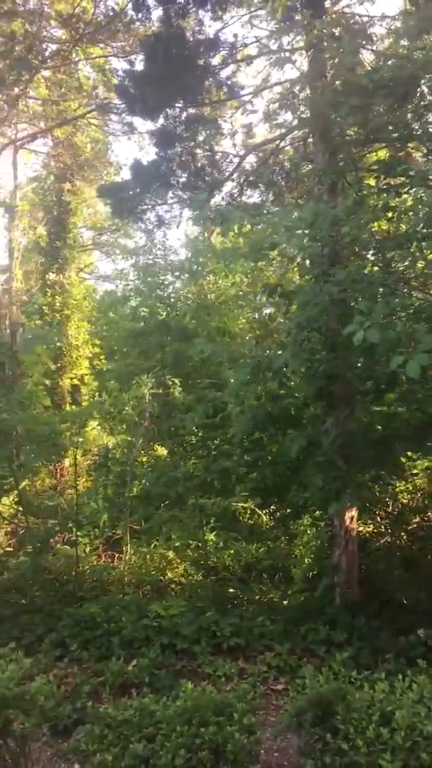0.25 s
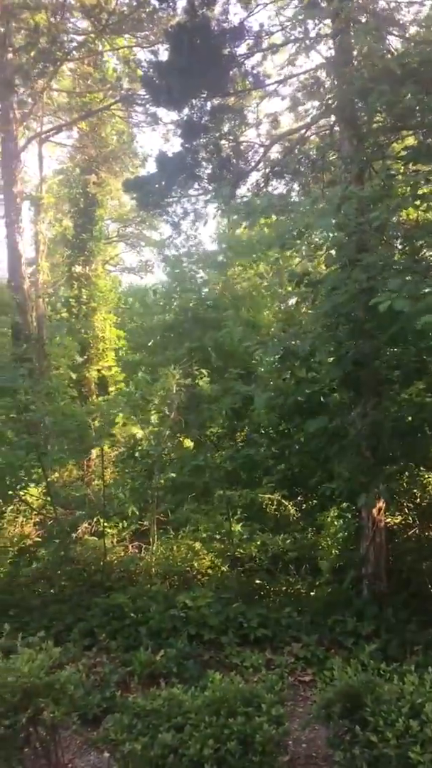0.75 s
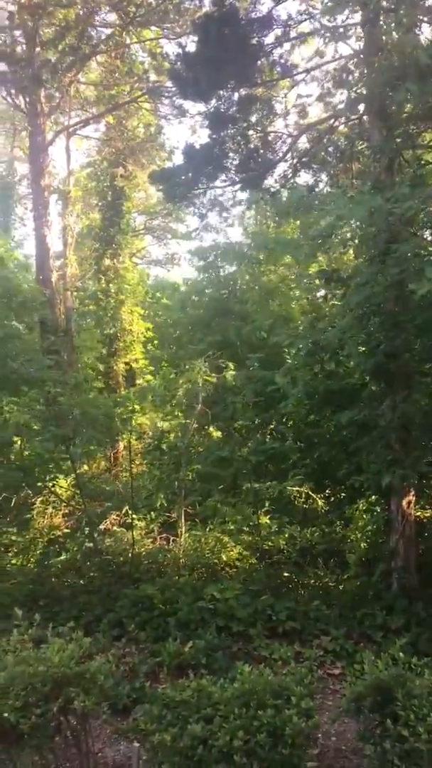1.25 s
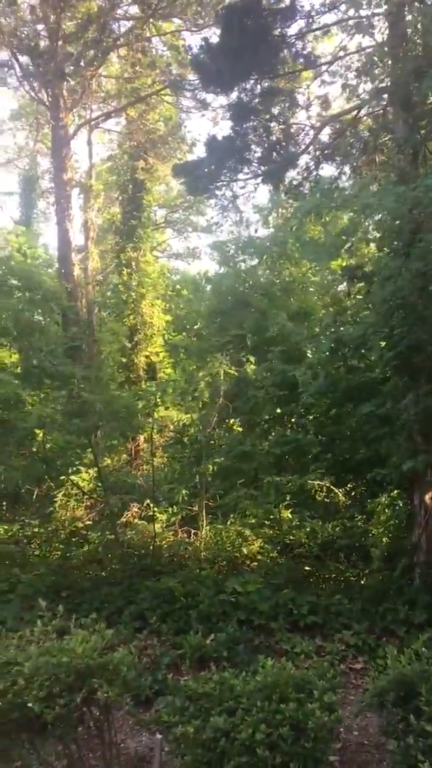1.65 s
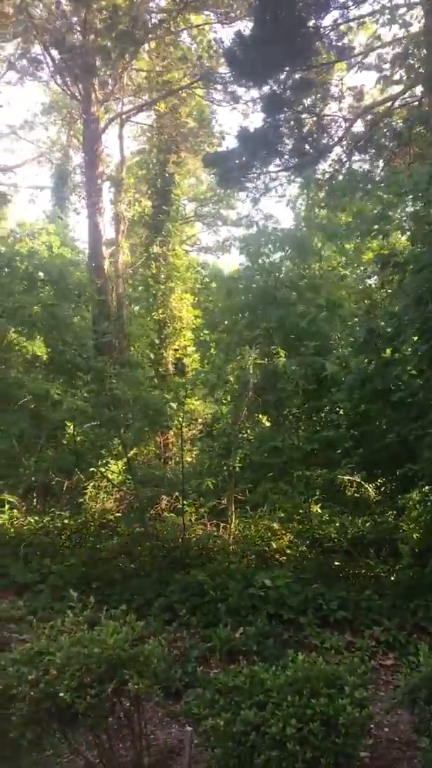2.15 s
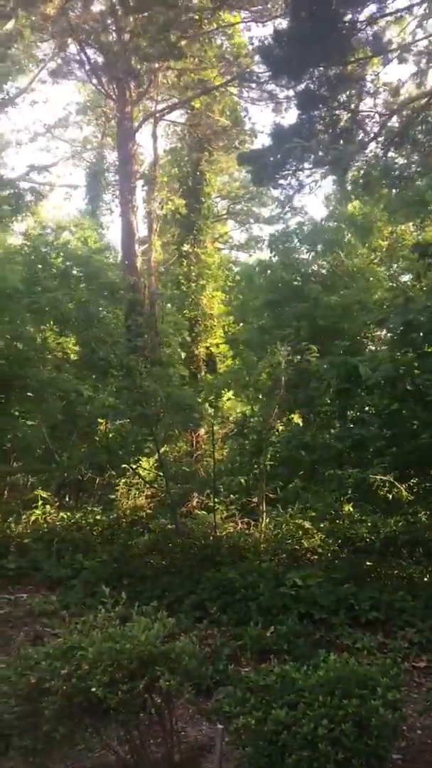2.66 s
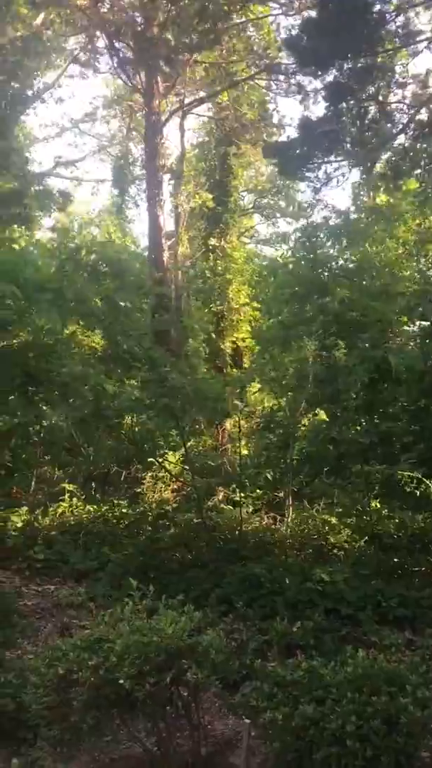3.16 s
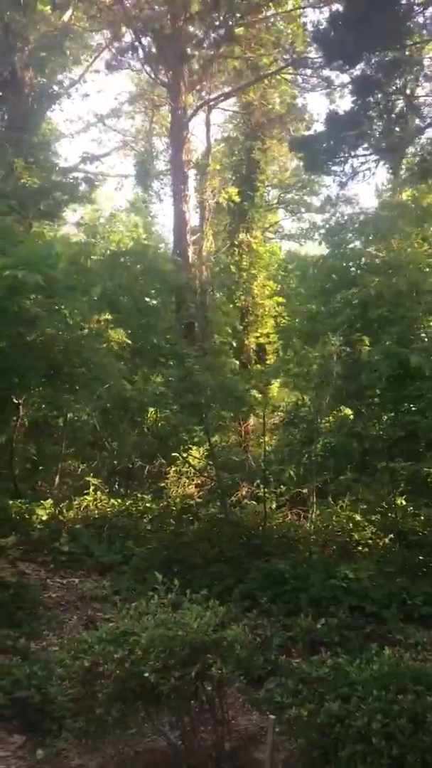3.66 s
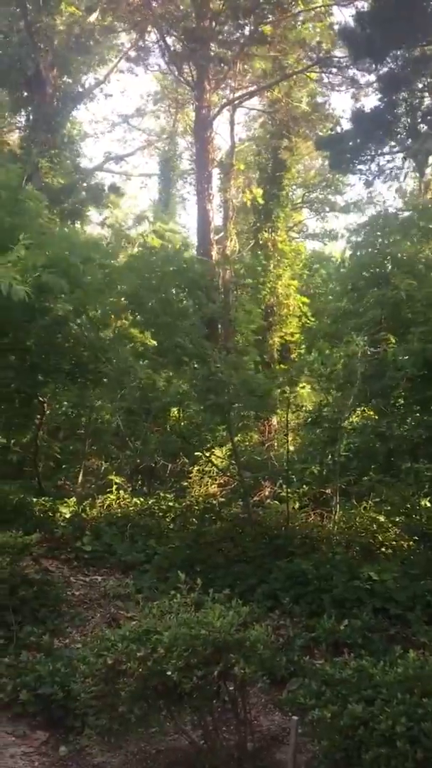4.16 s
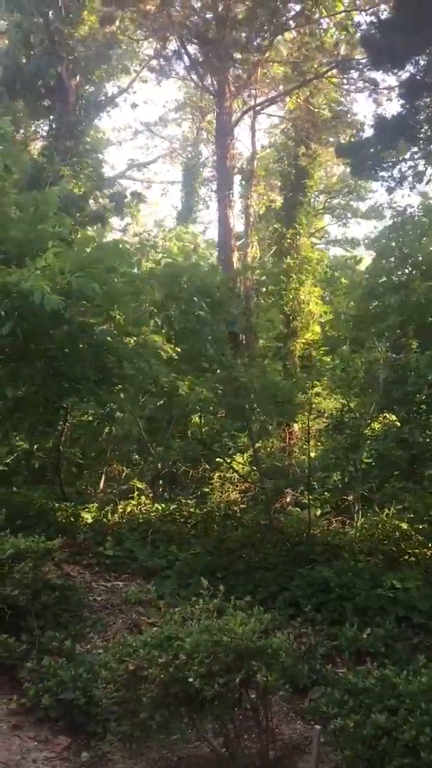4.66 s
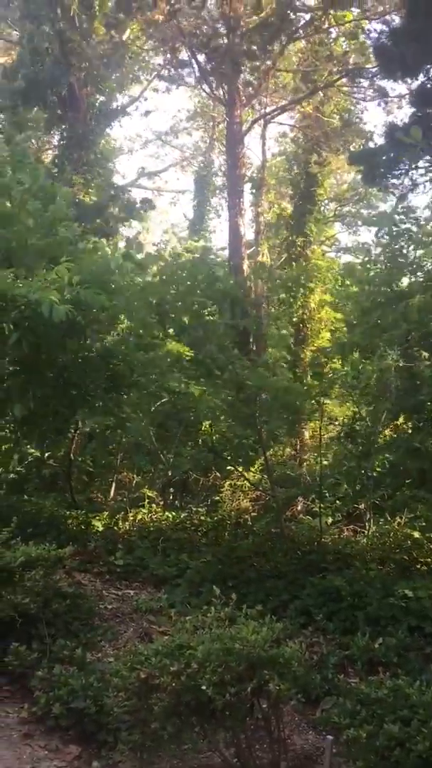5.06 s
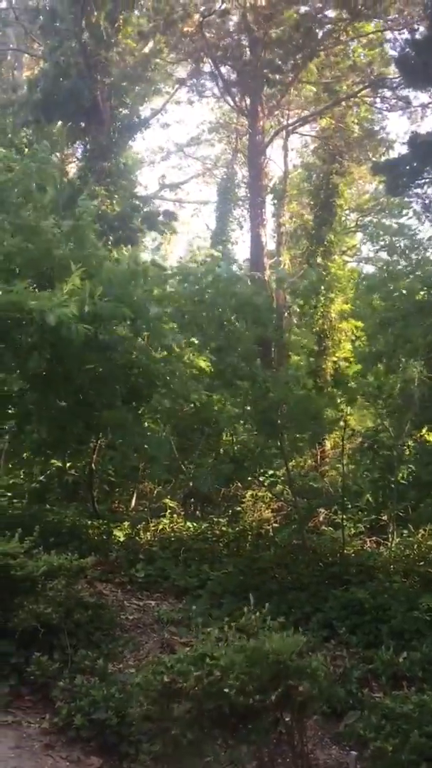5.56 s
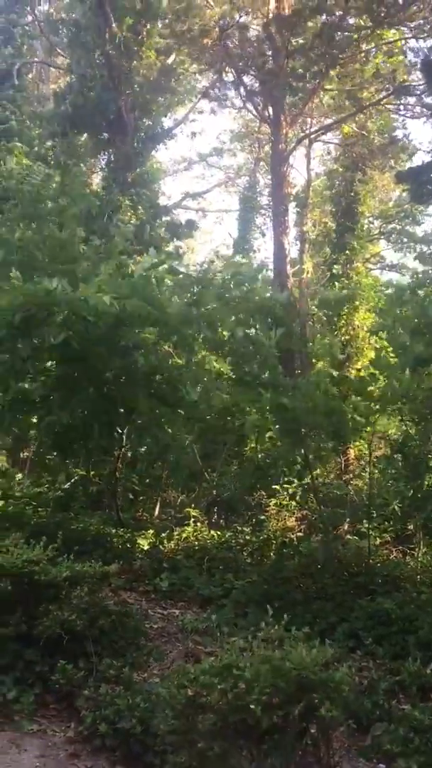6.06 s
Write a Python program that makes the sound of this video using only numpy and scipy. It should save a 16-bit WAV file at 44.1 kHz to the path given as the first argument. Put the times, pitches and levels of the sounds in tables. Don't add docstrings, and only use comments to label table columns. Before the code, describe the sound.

Continuous woodland wind, with broad canopy wash, crisp leaf hiss and fine ticking. At first a faint quick trill dies away deep in the wood. Regular distant falling-and-rising chirps follow, joined by short, high, thin whistles from a closer bird, all lightly echoing off trunks. In the last two seconds, low buffeting bumps and flutters on the microphone, almost mono, growing heavier before the end.

```python
import sys
import numpy as np
from scipy import signal
from scipy.fft import rfft, irfft, next_fast_len
from scipy.io import wavfile
from scipy.ndimage import uniform_filter1d, map_coordinates

SR = 44100
rng = np.random.default_rng(int(sys.argv[2]) if len(sys.argv) > 2 else 0)


def put_to_file(sound):
    columns = np.atleast_2d(sound).T
    safe = np.clip(columns, -1, 1)
    whole_steps = np.round(safe * 32767)
    wavfile.write(sys.argv[1], SR, whole_steps.astype(np.int16))


def undo_db(level):
    steps = np.asarray(level, float) / 20
    return 10 ** steps


N = 277830
TIME = np.arange(N) / SR


def unit(x):
    return x / np.sqrt(np.mean(x ** 2) + 1e-20)


def wobble(rate, size=N):
    knots = rng.standard_normal(int(size * rate / SR) + 4)
    return map_coordinates(knots, [TIME[:size] * rate])


def coloured(x, spectrum):
    m = next_fast_len(N + 8192)
    hz, db = np.transpose(spectrum)
    bins = np.fft.rfftfreq(m, 1 / SR)
    level = np.interp(np.log(bins + 1), np.log(hz + 1), db, -120, -120)
    return unit(irfft(rfft(x, m) * undo_db(level), m)[:N])


def smooth_field(shape, bins, frames):
    field = uniform_filter1d(rng.standard_normal(shape), size=bins, axis=0)
    return unit(uniform_filter1d(field, size=frames, axis=1))


def rush(spectrum, patchy_db, speckle_db=0):
    z = signal.stft(rng.standard_normal(N), nperseg=1024)[2]
    patches = patchy_db * smooth_field(z.shape, 12, 6)
    speckle = speckle_db * smooth_field(z.shape, 2, 3)
    noise = signal.istft(z * undo_db(patches + speckle), nperseg=1024)[1][:N]
    return coloured(noise, spectrum)


def evened(x, share):
    return unit(x / (np.abs(signal.hilbert(x)) + .25) ** share)


def bumps(rows):
    s, length, db = np.transpose(list(rows))[:, :, None]
    coarse = TIME[::16]
    power = np.sum(undo_db(2 * db) * np.exp(-((coarse - s) / length) ** 2), axis=0)
    return np.interp(TIME, coarse, np.sqrt(power))


# (time [s], rumble level [dB])
GUSTS = [(0, -52.5), (.5, -48.5), (1.1, -51.5), (2, -49.5), (2.45, -51.5), (3.2, -49.5), (3.55, -50.5),
         (3.74, -52), (3.81, -57), (3.88, -52), (4.05, -50), (4.45, -57), (4.9, -55), (5.26, -57.5),
         (5.5, -51.5), (6.3, -56)]
# (frequency [Hz], level [dB per Hz])
RUMBLE_SPECTRUM = [(13, -49), (22, -28), (53, 0), (75, -0.5), (118, 0), (146, -4), (345, -14), (450, -18),
                   (580, -38), (990, -120)]
# (frequency [Hz], level [dB per Hz])
CANOPY_SPECTRUM = [(180, -27), (300, -3.5), (344, -5.5), (451, -6.5), (530, -1), (695, 0.5), (1130, 0),
                   (2600, -7.5), (3380, -23), (5720, -120)]
# (frequency [Hz], level [dB per Hz])
LEAVES_SPECTRUM = [(1500, -120), (2200, -13), (3000, -2), (4300, -3), (4700, -5), (4900, -11.5), (5150, -5),
                   (7000, -8), (9000, -10.5), (9900, -12.5), (10400, -19.5), (11100, -16), (13000, -20),
                   (15700, -26)]
# (time [s], length [s], level [dB])
BRANCH_SHAKES = [
    (1.725, .028, -52),
    (0.267, .012, -62),
    (2.0, .02, -68),
    (6.19, .04, -63),
]


def wind():
    gust_db = np.interp(TIME, *np.transpose(GUSTS))
    swing_db = gust_db - gust_db.mean()
    rumble_db = gust_db + 1.5 + 1.3 * wobble(4.99) + 1.2 * wobble(16)
    rumble = undo_db(rumble_db) * rush(RUMBLE_SPECTRUM, patchy_db=0.65)

    canopy_db = -48.5 - .05 * swing_db + 0.42 * wobble(5.96)
    canopy = undo_db(canopy_db) * rush(CANOPY_SPECTRUM, patchy_db=0.55, speckle_db=2.5)
    low_pass = signal.butter(3, 413, fs=SR, output="sos")
    low = signal.sosfiltfilt(low_pass, canopy)
    canopy = canopy + (undo_db(.35 * swing_db) - 1) * low

    leaves_db = -63 + 0.02 * swing_db
    hiss_db = leaves_db + 10 + 0.35 * wobble(9)
    hiss = undo_db(hiss_db) * rush(LEAVES_SPECTRUM, patchy_db=0.63, speckle_db=2.5)
    touches = rng.random(N) < 700 / SR
    ticks = rng.standard_normal(N) * touches * undo_db(2.4 * rng.exponential(size=N))
    ticks = coloured(ticks, LEAVES_SPECTRUM) * (undo_db(leaves_db - 6.5) + bumps(BRANCH_SHAKES))
    return rumble + canopy + hiss + ticks


# (centre [s], rocking [Hz], thump level [dB], flutter over thump [dB])
PORT_EDDIES = [(4.487, 89.5, -39.5, -19), (4.520, 95, -39, -22), (4.550, 59.6, -37, -33),
               (4.732, 75.35, -34.5, -13), (4.759, 120.1, -34.5, -9), (4.796, 72.4, -36, -14),
               (4.830, 66.1, -36.5, -12), (4.979, 110.6, -32.5, -6), (4.996, 79.9, -27.5, -17.5),
               (5.020, 69.4, -37, -13), (5.051, 62.3, -41, -9), (5.365, 85, -40, -9), (5.40, 70, -45, -12),
               (5.525, 84.4, -30, -16), (5.557, 104.9, -40, -13), (5.630, 78.2, -41, -11),
               (5.743, 111.3, -32.5, 1), (5.768, 70.2, -33.5, -15), (5.830, 75.7, -39, -7.5),
               (5.92, 71.94, -27, -16), (5.967, 85, -24, -8.5), (5.995, 73.2, -25, -12.5),
               (6.027, 70.7, -30, -11.5), (6.067, 85.44, -32, -23), (6.199, 75, -26, -15)]
# (frequency [Hz], level [dB per Hz])
THUMP_SPECTRUM = [(15, -60), (30, -21), (50, 1), (72, 2), (110, -12.5), (170, -15.5), (260, -39),
                  (500, -70)]
# (frequency [Hz], level [dB per Hz])
FLUTTER_SPECTRUM = [(60, -40), (140, 2), (250, -3.5), (450, -10.5), (800, -21.5), (1300, -56)]
# (frequency [Hz], level [dB per Hz])
SNAP_SPECTRUM = [(150, -30), (350, -2), (700, -5), (1100, -18), (1600, -60)]


def buffeting():
    s, hz, thump_db, flutter_db = np.transpose(PORT_EDDIES)
    length = 0.88 / hz
    phase = 2 * np.pi * np.cumsum(np.interp(TIME, s, hz) * (1 + 0.1198 * wobble(60))) / SR
    rocking = np.sin(phase) + 0.26 * np.sin(2 * phase + wobble(25))
    rocking = unit(rocking + 0.51 * rush(THUMP_SPECTRUM, patchy_db=1))
    wake_lag_s, wake_s, wake_db = 0.055, 0.04, -17.5
    wake = [(t + wake_lag_s, wake_s, db + wake_db) for t, db in zip(s, thump_db)]
    thump = bumps([*zip(s, length, thump_db), *wake]) * rocking

    flutter = evened(rush(FLUTTER_SPECTRUM, patchy_db=1.0), share=0.66)
    flutter *= bumps(zip(s, 0.77 * length, thump_db + flutter_db))
    snap_s, snap_db = 0.006, thump_db - 12 + 2.2 * flutter_db
    snap = evened(rush(SNAP_SPECTRUM, patchy_db=0), share=.6)
    snap *= bumps((t, snap_s, db) for t, db in zip(s, snap_db))
    low_cut = signal.butter(2, 35, "high", fs=SR, output="sos")
    return signal.sosfilt(low_cut, thump + flutter + snap)


def add(out, s, knots, hz, db, overtone_db, waver, twinkle_db, wet_db, t60):
    t, lag = TIME[:int(knots[-1] * SR)], TIME[:SR // 3]
    drift = wobble(251.5, size=len(lag))[:len(t)]
    fading = wobble(129.5, size=len(lag))[:len(t)]
    phase = 2 * np.pi * np.cumsum(np.interp(t, knots, hz) * (1 + waver * drift)) / SR
    level = np.sqrt(2) * undo_db(np.interp(t, knots, db)) * unit(undo_db(twinkle_db * fading))
    level *= np.minimum(1, np.minimum(t, t[::-1]) / 0.0028)
    note = level * (np.sin(phase) + undo_db(overtone_db) * np.sin(2 * phase))
    struck = (rng.random(len(lag)) < 900 / SR) * (lag > .003)
    trunks = rng.standard_normal(len(lag)) * struck * undo_db(-60 * lag / t60)
    echo = signal.fftconvolve(note, trunks)
    heard = undo_db(wet_db) * echo * np.linalg.norm(note) / np.linalg.norm(echo)
    heard[:len(t)] += note
    start = round(s * SR)
    out[start:][:len(heard)] += heard[:N - start]


# (time [s], length [s], top [Hz], end [Hz], level [dB])
NEAR_WHISTLES = [
    (1.813, 0.043, 7000, 7100, -53.5),
    (2.613, 0.042, 6930, 7200, -50.5),
    (3.447, 0.06, 7384, 7340, -44.5),
    (4.003, .03, 7100, 7050, -53),
    (4.011, .052, 8130, 7540, -46.5),
    (4.543, .062, 7330, 7420, -48),
    (5.092, .058, 7200, 7480, -47.5),
]
# (time [s], length [s], start [Hz], end [Hz], level [dB])
PIPING_NOTES = [
    (1.794, .145, 4310, 4090, -58.5),
]


def near_birds():
    out = np.zeros(N)
    scoop = 0.0545
    for s, length, top, end, db in NEAR_WHISTLES:
        climb = .22 if end < top / 1.04 else .42
        knots = length * np.array([0, .37 * climb, climb, .75, 1])
        pitch = [top * (1 - scoop), top * (1 - 0.43 * scoop), top, .6 * top + .4 * end, end]
        add(out, s, knots, pitch, db + np.array([-9, -4.5, 2.0, -2.5, -6]),
            overtone_db=-22, waver=0.0032, twinkle_db=3.0, wet_db=-3.0, t60=0.24)
    for s, length, start, end, db in PIPING_NOTES:
        knots = length * np.array([0, .2, .45, 1])
        pitch = [start, .72 * start + .28 * end, end, end]
        add(out, s, knots, pitch, db + np.array([-5, 1.5, -2.0, -1.5]),
            overtone_db=-30, waver=.005, twinkle_db=5.0, wet_db=-5, t60=0.25)
    return out


# (start of the fall [s], level [dB], opening note [Hz], opening over the rest [dB], lowest [Hz])
FAR_CHIRPS = [(1.078, -54.5, 5040, -11, 2965), (1.853, -52.5, 5010, -12, 3100),
              (2.197, -53.5, 5150, -3, 2990), (2.579, -54, 5480, -1.5, 3150),
              (3.190, -53.5, 5060, -8, 3200), (3.690, -53, 5010, -6, 2950), (4.185, -54, 4890, -12, 3130),
              (4.693, -58, 5130, -8, 3255), (5.243, -52, 5020, -8, 3060), (5.824, -55, 4890, -10, 3040)]


def far_bird():
    out = np.zeros(N)
    fall_s, dwell_s, rise_s, close_s = .012, .027, .021, .018
    dwell_db, close_db = -2.5, -9
    for s, db, first, open_db, low in FAR_CHIRPS:
        held = .042 + .0025 * open_db
        knots = np.cumsum([0, held, .5 * fall_s, .5 * fall_s, dwell_s, rise_s, close_s])
        pitch = [first, first, .5 * (first + low), 1.08 * low, low, 1.35 * low, 1.07 * low]
        level_db = db + np.array([open_db, open_db, 3.5, dwell_db, dwell_db, 1.5, close_db])
        add(out, s - held, knots, pitch, level_db,
            overtone_db=-40, waver=.013, twinkle_db=2.5, wet_db=2.5, t60=.3)
    return out


# (time [s], level [dB])
TRILL_NOTES = [
    (.027, -56.5),
    (.128, -53.5),
    (.262, -56.5),
    (.369, -56.5),
    (.468, -56.5),
    (.555, -62),
    (.665, -56.5),
    (.77, -70),
]


def trill():
    out = np.zeros(N)
    for s, db in TRILL_NOTES:
        pitch = 6410 - 260 * s ** 2
        scoop = 50 + 290 * s
        add(out, s, .05 * np.array([0, .5, 1]), [pitch - scoop, pitch, pitch - 0.35 * scoop],
            db + np.array([-4.5, -1.5, -5]),
            overtone_db=-40, waver=0.011, twinkle_db=4.2, wet_db=2.0, t60=0.38)
    return out


def scene():
    mono = wind() + buffeting() + near_birds() + far_bird() + trill()
    return np.tile(mono, (2, 1))


def band_limit(x):
    return signal.sosfilt(signal.butter(12, 15730, fs=SR, output="sos"), x)


def record(dry):
    hz, t, z = signal.stft(dry[0], SR, nperseg=1024)
    band = (hz / 1400).astype(int)
    frame = np.arange(len(t)) // 2
    chance = rng.random((band[-1] + 1, frame[-1] + 1)) < .012
    filled = chance[band][:, frame] & (hz > 4200)[:, None]
    random_phase = np.exp(2j * np.pi * rng.random(z.shape))
    side = signal.istft(undo_db(-6.0) * filled * z * random_phase, SR, nperseg=1024)[1][:N]
    return band_limit(dry + [side, -side])


dry = scene()
out = record(dry)
put_to_file(out)
```